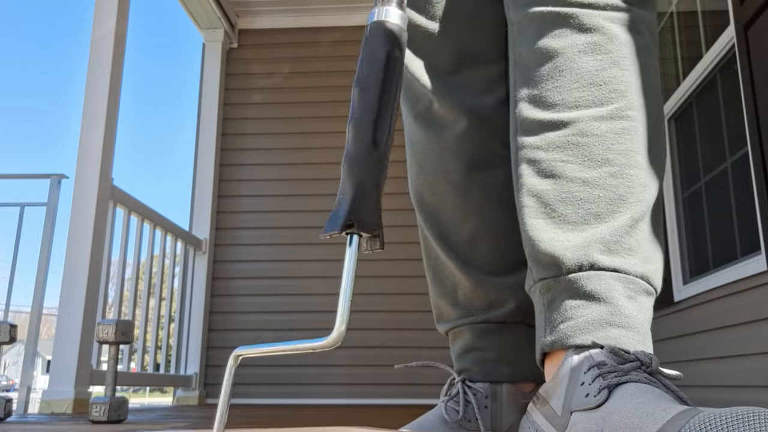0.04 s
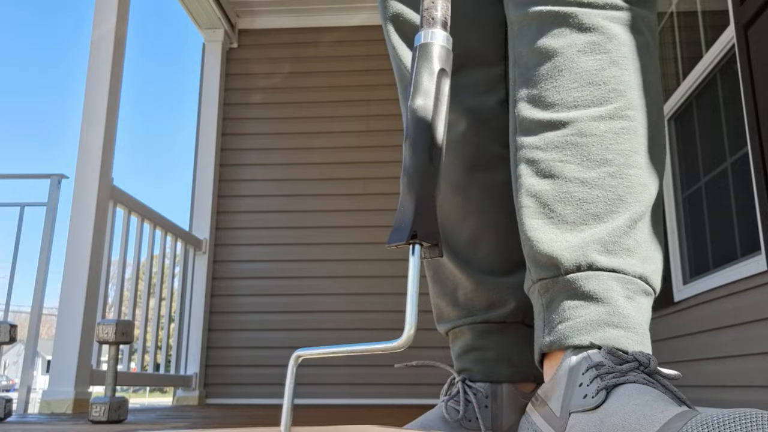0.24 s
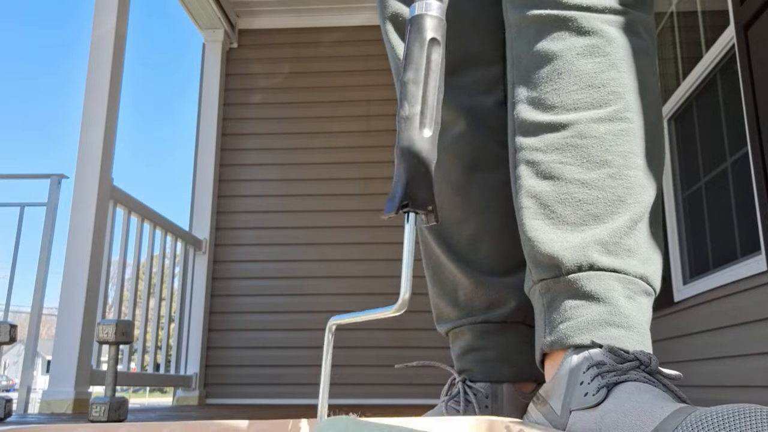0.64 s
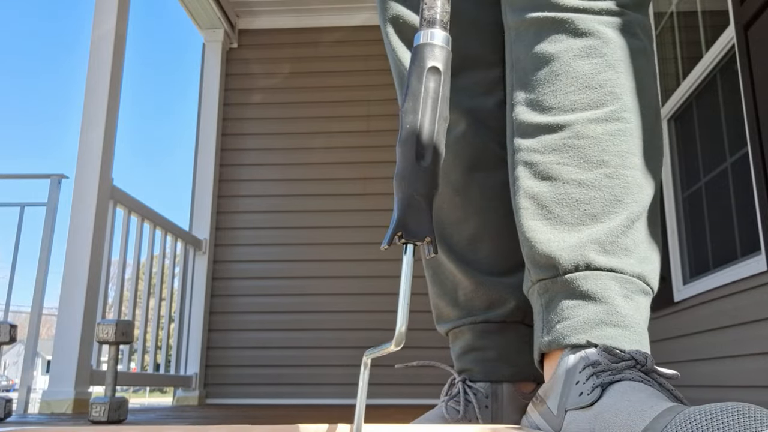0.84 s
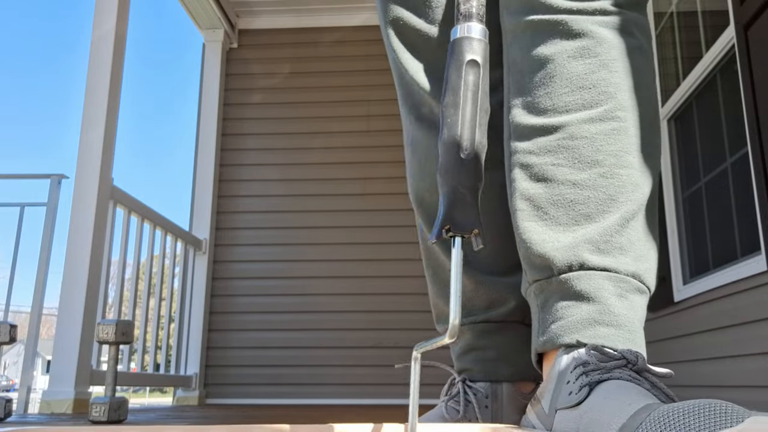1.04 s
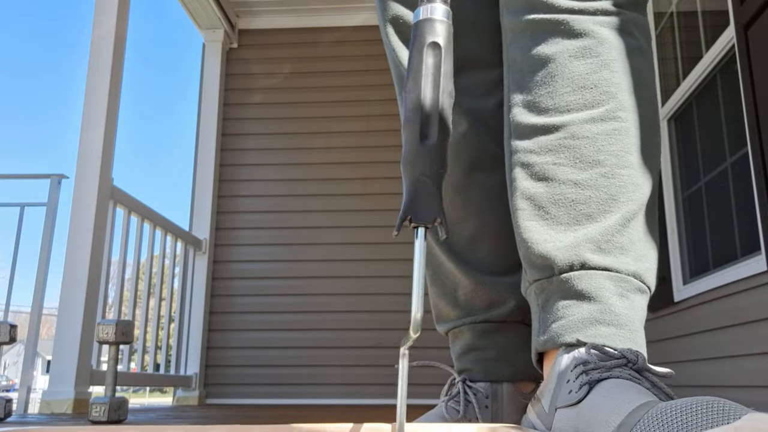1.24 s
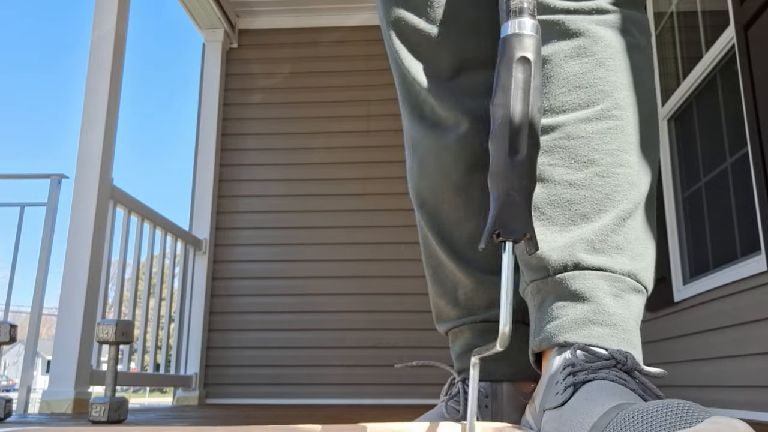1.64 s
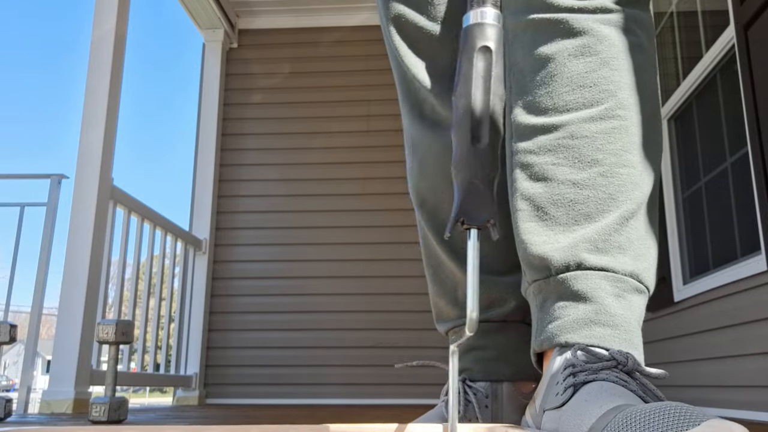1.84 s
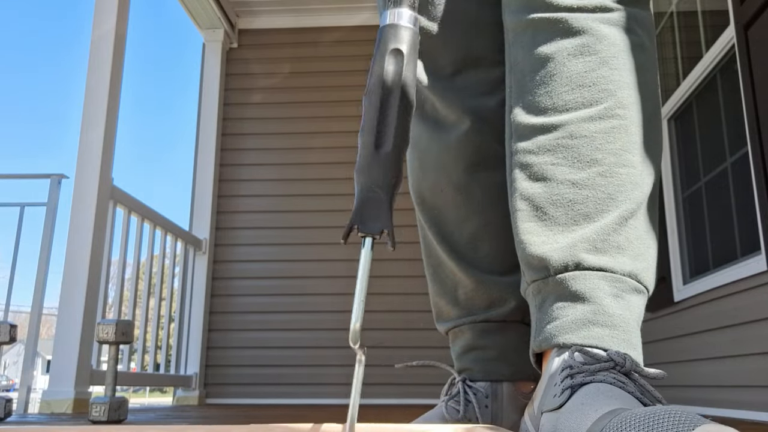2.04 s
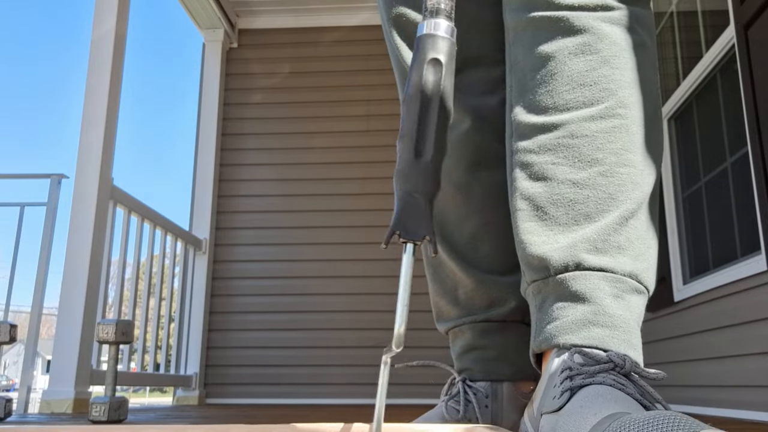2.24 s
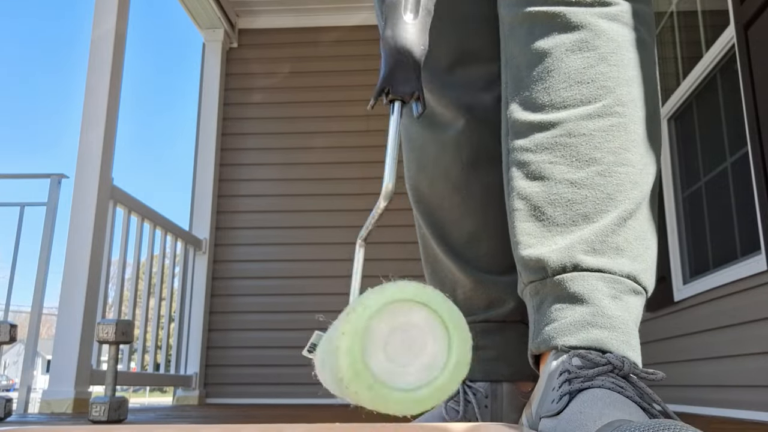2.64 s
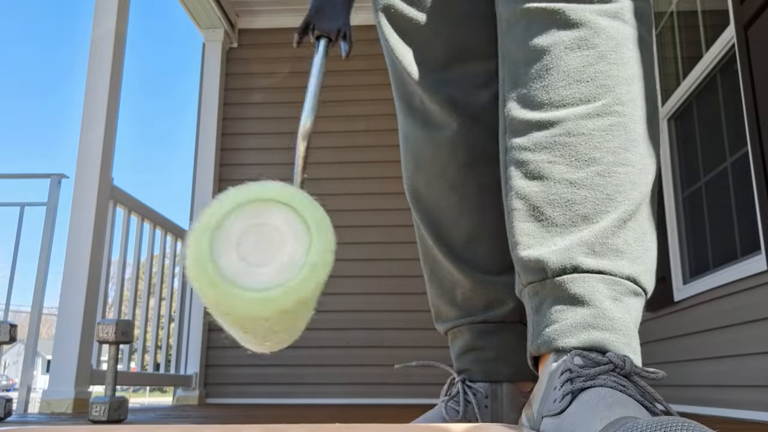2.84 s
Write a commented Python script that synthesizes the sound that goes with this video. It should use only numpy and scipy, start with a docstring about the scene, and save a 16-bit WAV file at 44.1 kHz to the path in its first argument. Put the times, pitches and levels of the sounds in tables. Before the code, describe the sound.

A paint roller rubs over wooden porch boards close by, loudest from 0.3 to 0.8 seconds, with a sticky hiss, hollow rumble and light frame knocks. Softer rolling follows with a faint drone, swelling again near 1.7 and 2 seconds, with a sharp clack at 1.9. Small paint pops and bumps come around 2.5 seconds, and the roller lifts off by 2.8, leaving quiet outdoor air.

```python
"""Paint roller on a wooden porch.

A roller on a pole is pushed back and forth over the boards, close to the microphones. The sleeve rubs
on the wood, its wet nap peels off with a fine hiss and a few pops, and the deck rumbles under the load.
The spinning sleeve drones early in a stroke. The wire frame knocks as the strokes turn, and the roller
bumps on the boards before it is lifted off."""
import sys
import numpy as np
from scipy import signal
from scipy.fft import rfft, irfft
from scipy.io import wavfile

SR = 44100
rng = np.random.default_rng(int(sys.argv[2]) if len(sys.argv) > 2 else 0)


def wav_record(signal):
    """Record a signal, one row per channel, as 16-bit PCM in the file named by sys.argv[1]."""
    frames = np.transpose(np.atleast_2d(signal))
    bounded = np.clip(frames, -1, 1)
    # unit amplitude maps onto the largest positive 16-bit level
    quanta = np.round(bounded * 32767).astype(np.int16)
    wavfile.write(sys.argv[1], SR, quanta)


N = 132300
TIME_S = np.arange(N) / SR
BINS_HZ = np.maximum(np.arange(N // 2 + 1) * SR / N, 1)


def from_db(db):
    """Decibels to gain."""
    return 10 ** (np.asarray(db) / 20)


def unit_rms(x):
    """Scale so the mean of the channels has rms 1."""
    return x / np.sqrt(np.mean(np.atleast_2d(x).mean(0) ** 2) + 1e-20)


def envelope(points):
    """Gain over time from (s, dB) points."""
    return from_db(np.interp(TIME_S, *np.transpose(points)))


def per_bin(points):
    """Join (Hz, value) points on a log frequency axis."""
    hz, value = np.transpose(points)
    return np.interp(np.log(BINS_HZ), np.log(hz), value)


def flutter(depth_db, rate_hz):
    """Randomly wavering gain."""
    drift = irfft(rfft(rng.standard_normal(N)) / (1 + (BINS_HZ / rate_hz) ** 2), N)
    return from_db(depth_db * unit_rms(drift))


def grains(per_s, spread_db, floor):
    """Gain of tiny random contacts of uneven size, over a steady floor."""
    contacts = rng.random(N) < per_s / SR
    sizes = from_db(spread_db * np.minimum(rng.exponential(1, N), 3))
    return np.sqrt(unit_rms(contacts * sizes) ** 2 + floor ** 2)


def resonances(modes, cut_hz):
    """Low-passed response of parallel (Hz, width Hz, dB) resonances of alternating sign."""
    peaks = sum((-1) ** k * from_db(db) / (1 + 1j * (BINS_HZ - hz * hz / BINS_HZ) / width_hz)
                for k, (hz, width_hz, db) in enumerate(modes))
    return peaks / (1 + (BINS_HZ / cut_hz) ** 4)


# Each row: frequency in Hz, coherence of the two microphones from 0 to 1.
MIC_COHERENCE = [(60, 0.99), (150, 0.94), (600, 0.9), (1200, 0.87), (1800, 0.095), (5000, 0.07)]
# Each row: frequency in Hz, phase lead of the left microphone in radians.
MIC_LEAD = [(90, -0.45), (400, 0.052), (950, 1.26), (1400, 1.03), (2200, -0.47)]


def stereo_noise(response, grain=1):
    """Noise, modulated by the grain, filtered and picked up by both microphones."""
    common, left, right = rfft(rng.standard_normal((3, N)) * grain)
    coherence = per_bin(MIC_COHERENCE)
    phase = np.exp(.5j * per_bin(MIC_LEAD) * np.array([[1], [-1]]))
    pair = np.sqrt(coherence) * common * phase + np.sqrt(1 - coherence) * np.array([left, right])
    return unit_rms(irfft(pair * response, N))


def strike(start_s, modes, rattle_s, spread_db=2.3):
    """A blow and brief rattle ring each (Hz, dB, T60 s) mode, a little differently each time."""
    t = np.arange(SR // 8) / SR
    out = np.zeros((2, N + SR))
    start = int(start_s * SR)
    for hz, db, t60_s in modes:
        force = rng.standard_normal((3, len(t))) * np.exp(-t / rattle_s)
        force[0, 0] += 1.3 * np.linalg.norm(force[0])   # first blow
        coherence = np.interp(hz, *np.transpose(MIC_COHERENCE))
        lead = np.interp(hz, *np.transpose(MIC_LEAD)) * np.array([[.5], [-.5]])
        ring = np.sin(2 * np.pi * hz * t + lead) * from_db(-60 * t / t60_s) * np.minimum(hz * t, 1)
        drive = np.sqrt(coherence) * force[0] + np.sqrt(1 - coherence) * force[1:]
        wave = signal.fftconvolve(drive, ring, axes=1)[:, :len(t)]
        gain = from_db(db + spread_db * rng.standard_normal())
        out[:, start:start + len(t)] += gain * wave * ring.std() / wave.std()
    return out[:, :N]


# Each row: frequency in Hz, relative level in dB.
AIR_SPECTRUM = [(20, 1.5), (48, 8.5), (75, 6), (120, 0.5), (300, -41), (700, -17), (1600, -19), (2200, -31),
                (4000, -44), (8000, -36.5), (9500, -64), (16000, -51)]


def outdoor_air(level_db=-46.5):
    """Quiet, steady air, mostly bass."""
    return from_db(level_db) * stereo_noise(from_db(per_bin(AIR_SPECTRUM)))


def porch_reverb(x, level_db=-16.5, t60_s=0.15, cut_hz=4600):
    """Wall and roof return a short, dull tail."""
    t = np.arange(SR // 3) / SR
    tail = rng.standard_normal((2, len(t))) * from_db(-60 * t / t60_s) * (t > .005)
    tail = signal.sosfilt(signal.butter(1, cut_hz, fs=SR, output="sos"), tail)
    tail /= np.linalg.norm(tail[0])
    return from_db(level_db) * signal.fftconvolve(x, tail, axes=1)[:, :N]


# Each row: time in seconds, level in dB.
RUMBLE_LEVEL = [(0, -39), (.1, -47.5), (.23, -38), (.3, -26), (.48, -28), (.58, -27), (.69, -24.5),
                (.76, -31.5), (.82, -30.5), (.88, -42), (1.25, -43.5), (1.34, -37.5), (1.42, -43),
                (1.62, -40), (1.68, -30.5), (1.77, -47), (1.87, -40.5), (1.98, -30), (2.05, -40.5),
                (2.1, -33.5), (2.18, -48.5), (2.32, -41.5), (2.44, -39.5), (2.5, -35.5), (2.57, -25.5),
                (2.7, -31.5), (2.77, -45), (3, -54.5)]
# Each row: frequency in Hz, relative level in dB.
RUMBLE_SPECTRUM = [(20, -51), (35, -29), (50, -13), (72, 1), (105, -2), (130, -6.5), (200, -9),
                   (290, -11.5), (420, -17), (800, -22.5), (2000, -62)]


def deck_rumble():
    """The hollow deck rumbles under the turning roller."""
    contacts = grains(per_s=550, spread_db=2.0, floor=0.7)
    return envelope(RUMBLE_LEVEL) * stereo_noise(from_db(per_bin(RUMBLE_SPECTRUM)), contacts)


# Each row: frequency in Hz, relative level in dB, T60 in seconds.
DECK_MODES = [(74.7, -10, 0.15), (106.6, -4.5, 0.11), (177, -12, 0.075)]
# Each row: frequency in Hz, width in Hz, relative level in dB.
BOARD_MODES = [(302, 55, -16), (436, 83, -5.5), (655, 63, 1), (1020, 230, -6.5), (1230, 160, -1),
               (1653, 330, -5)]
# Each row: start in seconds, deck level in dB, board level in dB.
ROLLER_BUMPS = [(0.366, -29, -15.5), (0.4227, -45, -17), (0.458, -20.5, -36), (.501, -26, -38),
                (.607, -35, -18.5), (0.682, -20, -20), (.804, -25, -34), (1.309, -40, -25),
                (1.325, -33, -23.5), (1.678, -16, -40), (1.918, -36, -16), (1.969, -21, -18),
                (1.981, -16, -34), (2.439, -20.5, -34), (2.559, -33, -18), (2.613, -31, -21.5),
                (2.648, -30, -27), (2.706, -26, -32.5)]


def roller_bumps():
    """Each bump flexes the deck and raps the board under the roller."""
    out = np.zeros((2, N))
    for start_s, deck_db, board_db in ROLLER_BUMPS:
        age_s = np.maximum(TIME_S - start_s, 0)
        for hz, db, t60_s in DECK_MODES:
            out -= from_db(deck_db + db - 60 * age_s / t60_s) * np.sin(2 * np.pi * hz * age_s)
        board = [(hz, board_db + db, np.log(1000) / np.pi / width_hz) for hz, width_hz, db in BOARD_MODES]
        out += strike(start_s, board, rattle_s=0.0039)
    return out


# Each row: frequency in Hz, relative level in dB, T60 in seconds.
FRAME_MODES = [(1050, 2.5, 0.016), (1577, -2, 0.024), (2403, -10, 0.017), (3770, -7.5, 0.0076),
               (4780, -4, 0.015), (6120, -5.5, 0.0028), (7880, -9.5, 0.024), (12240, -14, 0.0069),
               (14600, -9, .006)]
# Each row: start in seconds, ring level in dB, ring tilt in dB per octave, clack pitch in Hz,
# clack level in dB, crack level in dB, crack cutoff in Hz, rattle decay in seconds.
FRAME_KNOCKS = [(0.603, -17.5, -1.5, 745, -7.5, -12.5, 5050, 0.0024),
                (0.6324, -23.5, -3.5, 1000, -24, -18, 6500, 0.0014),
                (0.6493, -24, -4, 890, -22, -18.5, 5000, 0.0018),
                (0.8002, -25, -1, 2380, -12, -16, 2900, 0.0069),
                (0.8017, -18, -5, 1200, -13.5, -24.5, 14000, .0048),
                (1.3240, -28.5, 6, 1650, -21, -25.5, 15000, 0.0052),
                (1.8819, -25.5, -5, 1250, -12, -41, 3000, 0.0019),
                (1.9176, -20, -1, 1507, -4, -8, 4850, 0.0018),
                (1.9184, -28, 6.5, 6050, -18.5, -18, 7000, 0.0016),
                (2.0939, -22, -2, 920, -21, -14.5, 2940, 0.004),
                (2.5570, -34, 2.5, 697, -10.5, -28, 12800, 0.0015),
                (2.635, -31.5, -5.5, 870, -18, -29, 4000, 0.0031)]


def frame_knocks(clack_t60_s=0.018):
    """The sleeve hits its wire frame: a crack, the frame's ring and a clack pitched by the contact."""
    out = np.zeros((2, N))
    for start_s, ring_db, tilt, clack_hz, clack_db, crack_db, cut_hz, rattle_s in FRAME_KNOCKS:
        decay = (TIME_S >= start_s) * np.exp(-np.abs(TIME_S - start_s) / rattle_s)
        burst = rng.standard_normal((2, N)) * decay
        lowpass = signal.butter(4, cut_hz, fs=SR, output="sos")
        out += from_db(crack_db) * signal.sosfilt(lowpass, burst + 1e-18)
        ring = [(hz, ring_db + db + tilt * np.log2(hz / 2000), t60_s) for hz, db, t60_s in FRAME_MODES]
        out += strike(start_s, ring + [(clack_hz, clack_db, clack_t60_s)], rattle_s)
    return out


# Each row: start in seconds, level before the band-pass in dB.
PAINT_POPS = [(.4098, -15.5), (1.966, -23.5), (2.504, -26), (2.527, -29), (2.547, -27)]


def paint_pops(decay_s=0.0018, band_hz=(3500, 7600)):
    """Larger patches of tacky paint let go with a crisp pop."""
    bursts = sum(from_db(db) * (TIME_S >= start_s) * np.exp(-np.abs(TIME_S - start_s) / decay_s)
                 for start_s, db in PAINT_POPS)
    bandpass = signal.butter(2, band_hz, "band", fs=SR, output="sos")
    return signal.sosfilt(bandpass, bursts * rng.standard_normal((2, N)) + 1e-18)


# Each row: frequency in Hz, width in Hz, relative level in dB.
CORE_MODES = [(488, 68, -2.5), (720, 67, 1.5), (1100, 110, -7)]
# Each row: start in seconds, length in seconds, level in dB.
SLEEVE_SPINS = [(0.929, 0.16, -36), (1.544, 0.13, -34.5), (2.266, 0.091, -32.5)]


def sleeve_spin(attack_s=0.011, release_s=0.023):
    """The freely turning sleeve drones in its hollow core."""
    swell = np.zeros(N)
    for start_s, length_s, db in SLEEVE_SPINS:
        attack = np.clip((TIME_S - start_s) / attack_s, 0, 1)
        release = np.exp(-np.maximum(TIME_S - start_s - length_s, 0) / release_s)
        swell += from_db(db) * attack * release
    return swell * stereo_noise(resonances(CORE_MODES, cut_hz=1400))


# Each row: time in seconds, level in dB.
PEEL_LEVEL = [(0, -47), (.04, -61.5), (.18, -54), (.3, -31.5), (.36, -28.5), (.41, -35), (.5, -43.5),
              (.59, -54.5), (.62, -46), (.71, -37.5), (.79, -44), (.85, -54), (1.2, -51.5), (1.33, -42),
              (1.4, -67.5), (1.46, -56), (1.53, -60), (1.66, -36.5), (1.72, -60), (1.8, -70), (1.85, -52),
              (1.91, -47), (1.93, -42.5), (1.98, -38.5), (2.1, -46), (2.16, -64), (2.23, -60),
              (2.29, -48.5), (2.36, -47.5), (2.42, -37.5), (2.47, -46.5), (2.55, -40), (2.59, -55),
              (2.76, -56), (2.86, -76), (3, -74)]
SIZZLE_LEVEL = [(0, -72), (.2, -57.5), (.3, -42), (.38, -35.5), (.47, -45.5), (.58, -64), (.71, -51),
                (.86, -73), (1.3, -57), (1.4, -67), (1.65, -64), (1.78, -74), (2.0, -55), (2.18, -71),
                (2.41, -51.5), (2.62, -72), (2.75, -50.5), (2.87, -74)]
# Each row: frequency in Hz, relative level in dB.
PEEL_SPECTRUM = [(1200, -10), (1650, 10), (1950, 3.5), (2400, 7.5), (3000, 4), (4200, 0.5), (5000, -1),
                 (6300, -4.5), (7950, 1), (8500, -16), (10000, -22), (12000, -8.5), (16000, -29)]
SIZZLE_SPECTRUM = [(5000, -23), (9000, -4.5), (12000, -2.5), (16000, 1)]


def nap_peel():
    """Threads of wet paint snap as the nap peels off the wood; the finest ones sizzle."""
    snaps = grains(per_s=2000, spread_db=3.5, floor=1.0) * flutter(depth_db=1.6, rate_hz=36)
    fine_snaps = grains(per_s=4600, spread_db=2.0, floor=0.63) * flutter(depth_db=1.3, rate_hz=40)
    hiss = stereo_noise(from_db(per_bin(PEEL_SPECTRUM)), snaps)
    sizzle = stereo_noise(from_db(per_bin(SIZZLE_SPECTRUM)), fine_snaps)
    return envelope(PEEL_LEVEL) * hiss + envelope(SIZZLE_LEVEL) * sizzle


# Each row: time in seconds, level in dB.
RUB_LEVEL = [(0, -55), (.04, -55), (.09, -43.5), (.18, -39), (.31, -25), (.36, -26), (.43, -25.5),
             (.5, -35.5), (.55, -41), (.59, -44.5), (.61, -30.5), (.68, -26.5), (.78, -31), (.81, -29.5),
             (.84, -40), (1.06, -36.5), (1.2, -39.5), (1.315, -32), (1.37, -47), (1.415, -65),
             (1.44, -41.5), (1.52, -40), (1.6, -35), (1.66, -28), (1.73, -50), (1.8, -58.5), (1.87, -35),
             (1.91, -40), (1.93, -28.5), (1.99, -29.5), (2.1, -33.5), (2.15, -52), (2.23, -49), (2.29, -33),
             (2.42, -34), (2.48, -36), (2.56, -29), (2.59, -38), (2.64, -38.5), (2.71, -43.5), (2.78, -63),
             (3, -73)]
# Each row: frequency in Hz, relative level in dB.
RUB_SPECTRUM = [(100, -14.5), (280, -6), (430, -3.5), (540, 1), (680, -1), (900, 0.5), (1250, -5),
                (1600, -8), (1900, -24), (2400, -18.5), (3200, -26), (8000, -33)]


def sleeve_rub(soft_trim_db=-0.56, roar_db=-38, reference_db=-30, roar_db_per_db=1.23):
    """The sleeve rubs in dense, uneven slips; pressing harder brings out the boards' woody roar."""
    rub = envelope(RUB_LEVEL)
    fine_slips = grains(per_s=2500, spread_db=2.0, floor=0.71) * flutter(depth_db=1.9, rate_hz=31)
    soft = stereo_noise(from_db(per_bin(RUB_SPECTRUM)), fine_slips)
    coarse_slips = grains(per_s=700, spread_db=3.0, floor=0.36)
    roar = stereo_noise(resonances(BOARD_MODES, cut_hz=2190), coarse_slips)
    roar_gain = from_db(roar_db) * (rub / from_db(reference_db)) ** roar_db_per_db
    return from_db(soft_trim_db) * rub * soft + roar_gain * roar


def scene():
    """Roller strokes over outdoor air; only the hits reverberate."""
    hits = frame_knocks() + roller_bumps() + paint_pops()
    air = outdoor_air()
    rolling = sleeve_rub() + sleeve_spin() + nap_peel() + deck_rumble()
    return air + rolling + hits + porch_reverb(hits)


# Each row: frequency in Hz, left minus right level in dB.
MIC_BALANCE = [(100, 2.5), (550, 1), (1100, 3.5), (1700, 6.5), (2400, 2), (3400, -3), (5000, 3.5),
               (7600, 10), (9400, -1), (11200, -5), (14800, 3)]


def record(dry, low_cut_hz=33.7, high_cut_hz=16200):
    """Each microphone has its own colour and little deep bass; peaks clip at full scale, the top is cut."""
    balance = from_db(per_bin(MIC_BALANCE) * np.array([[.5], [-.5]]))
    heard = irfft(rfft(dry) * balance, N)
    highpass = signal.butter(4, low_cut_hz, "high", fs=SR, output="sos")
    lowpass = signal.ellip(10, .2, 80, high_cut_hz, fs=SR, output="sos")
    clipped = np.clip(signal.sosfilt(highpass, heard), -1, 1)
    return signal.sosfilt(lowpass, clipped)


dry = scene()
out = record(dry)
wav_record(out)
```